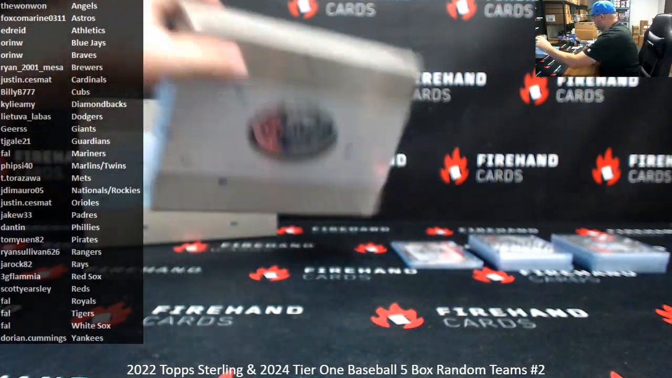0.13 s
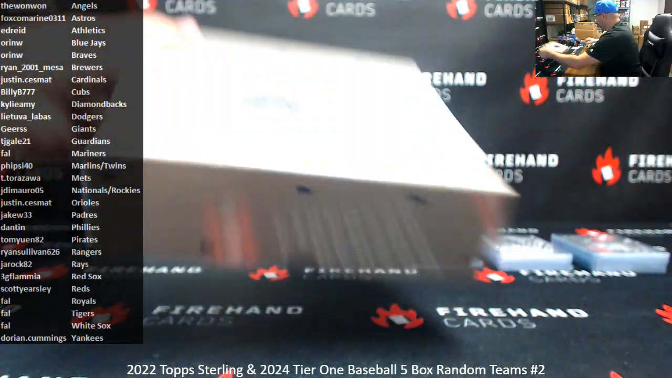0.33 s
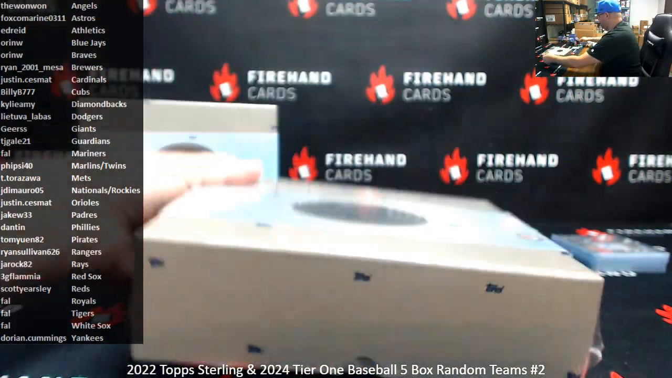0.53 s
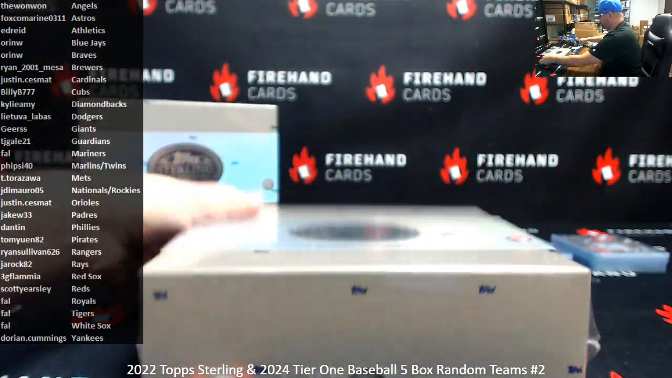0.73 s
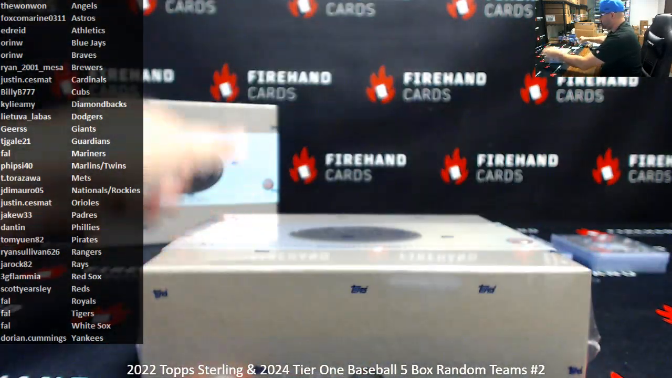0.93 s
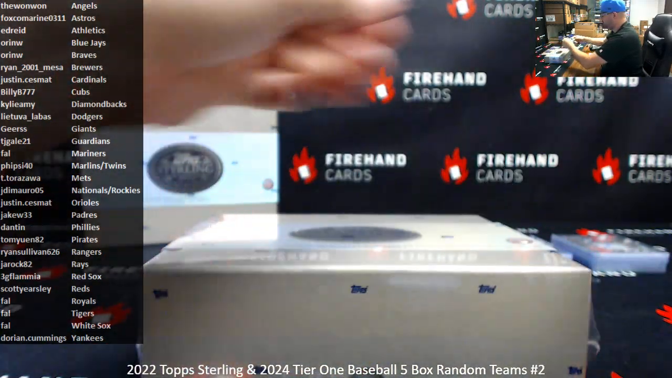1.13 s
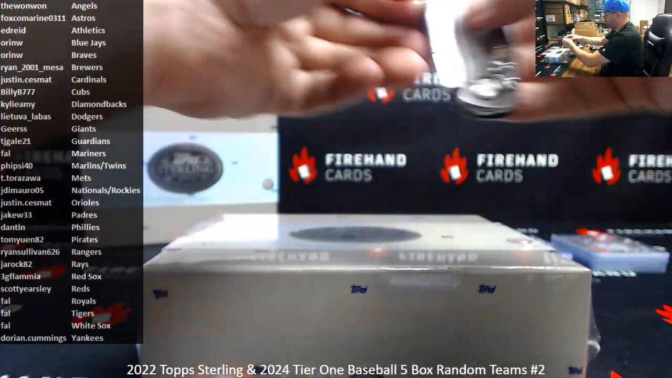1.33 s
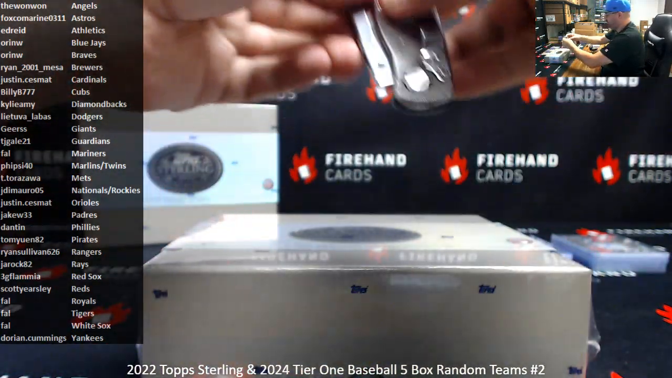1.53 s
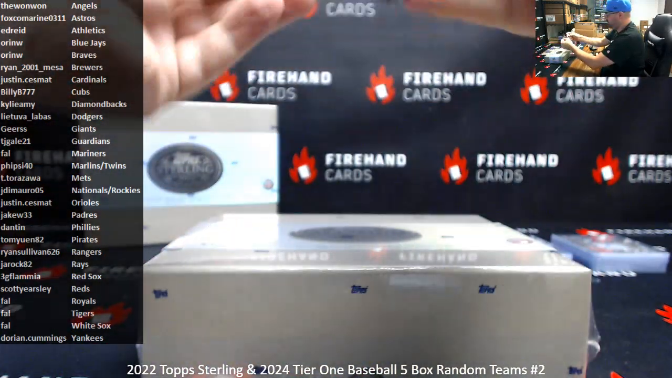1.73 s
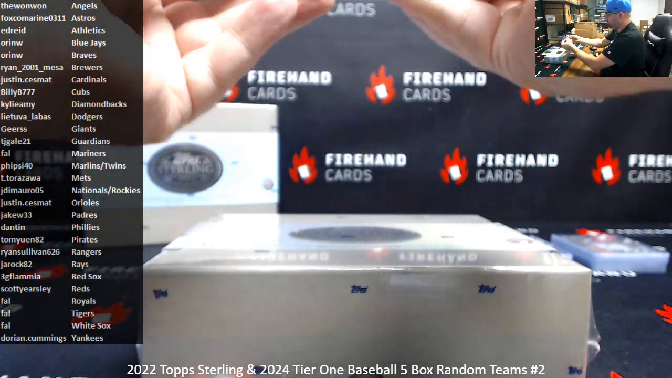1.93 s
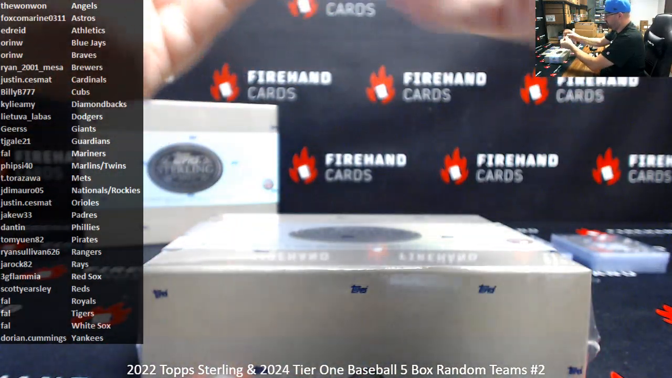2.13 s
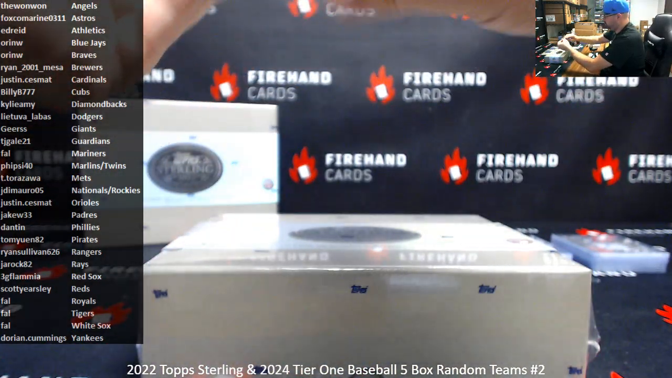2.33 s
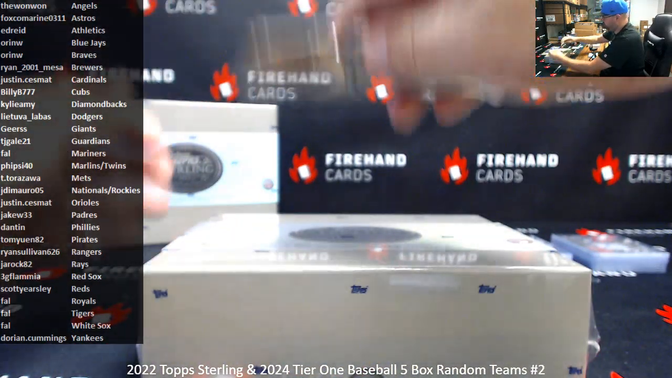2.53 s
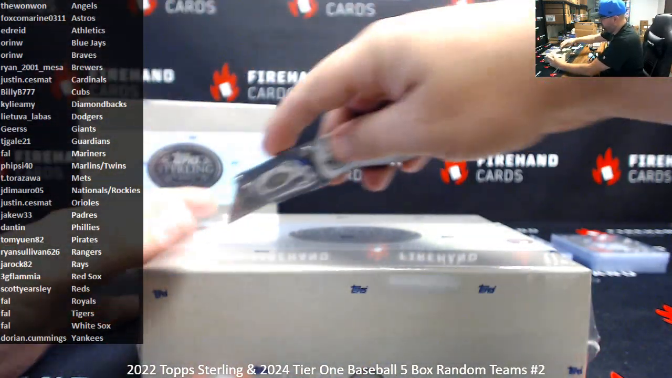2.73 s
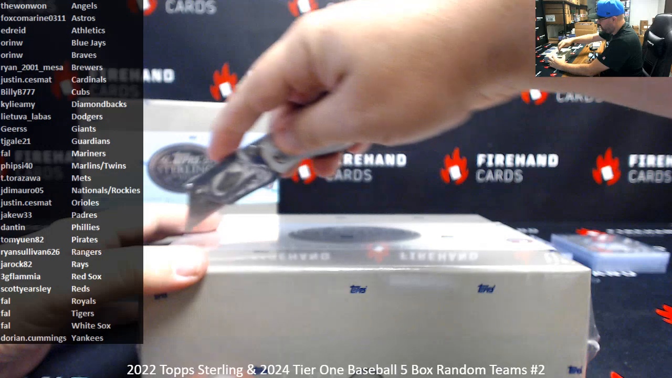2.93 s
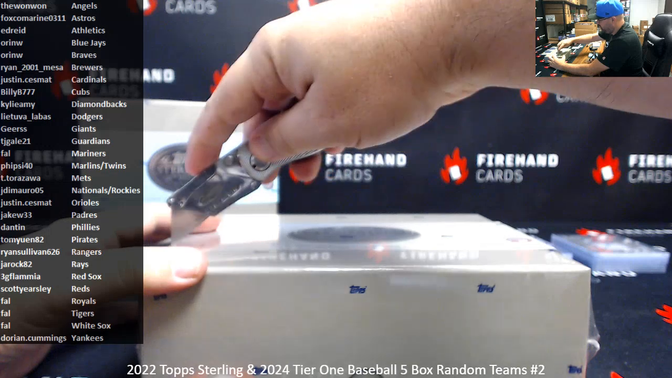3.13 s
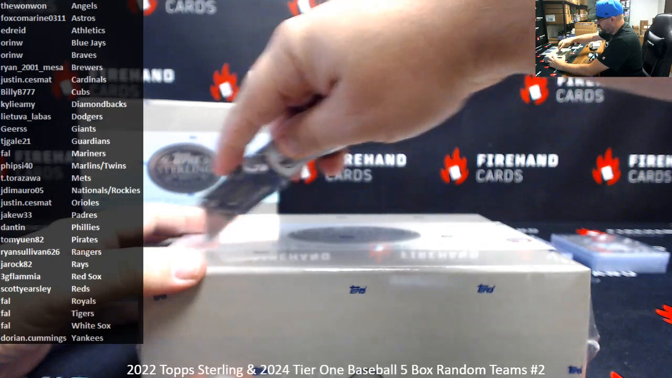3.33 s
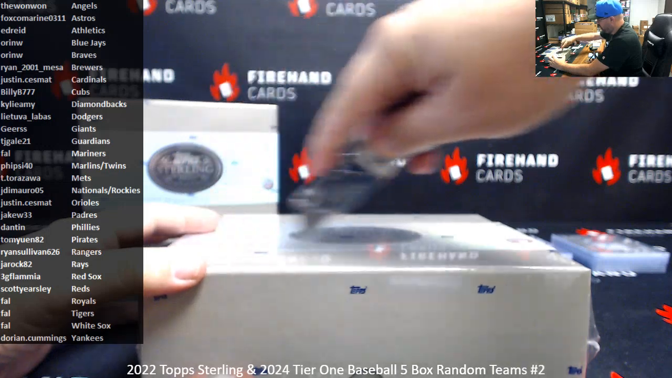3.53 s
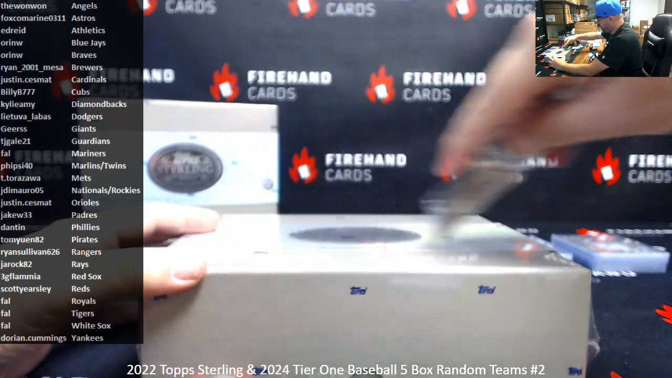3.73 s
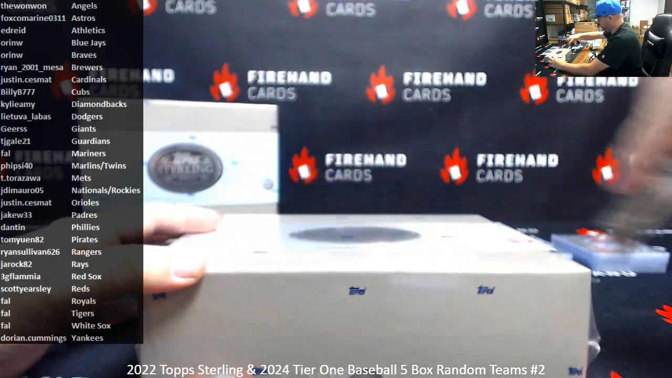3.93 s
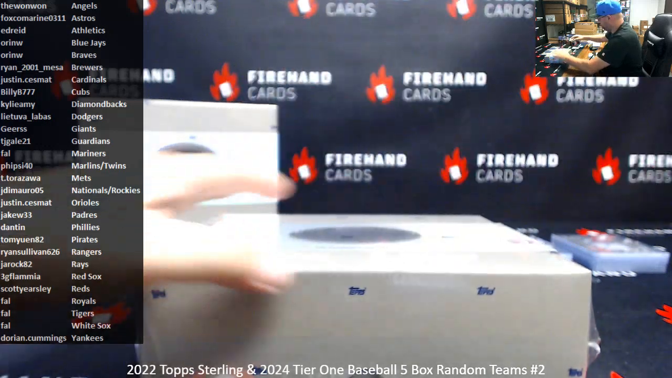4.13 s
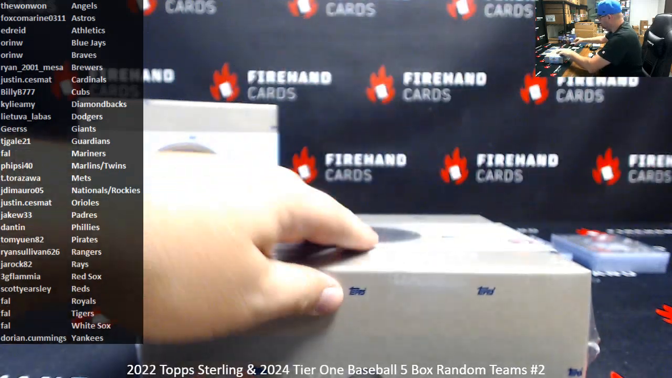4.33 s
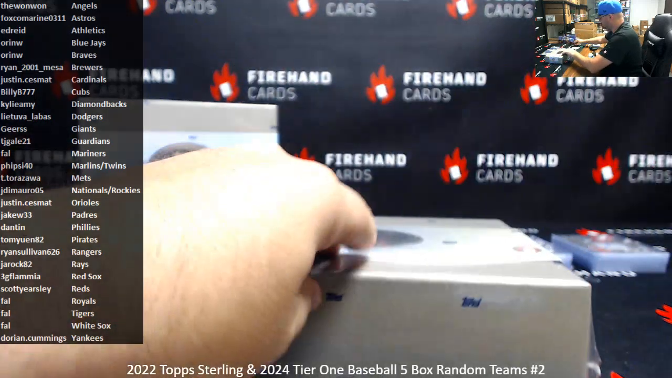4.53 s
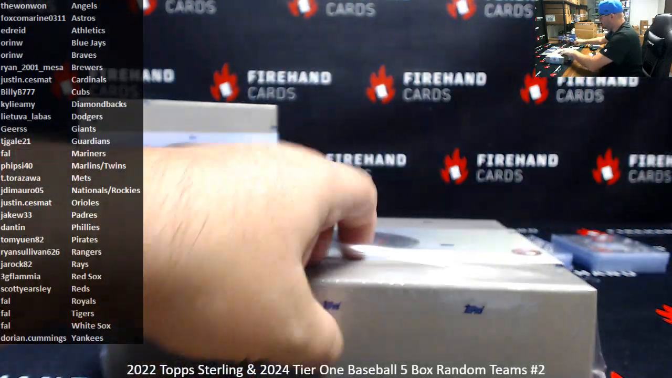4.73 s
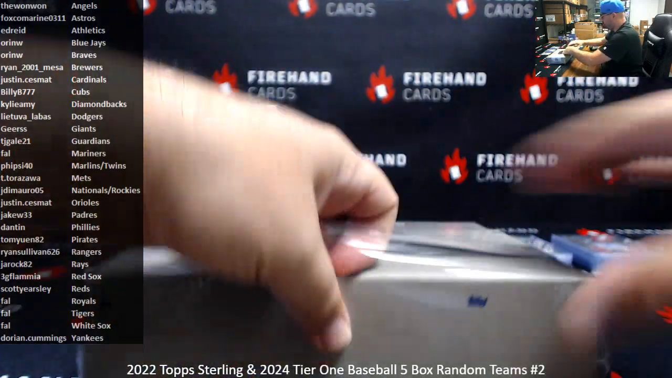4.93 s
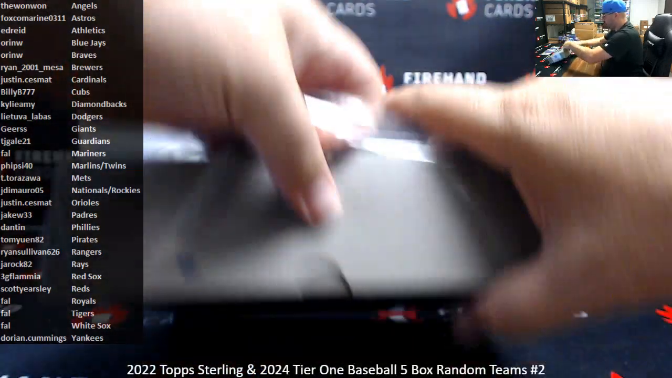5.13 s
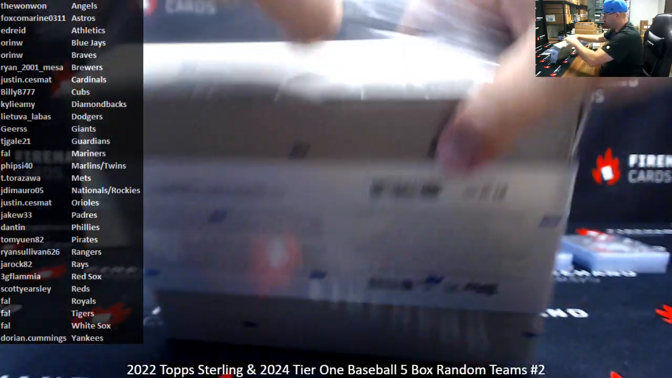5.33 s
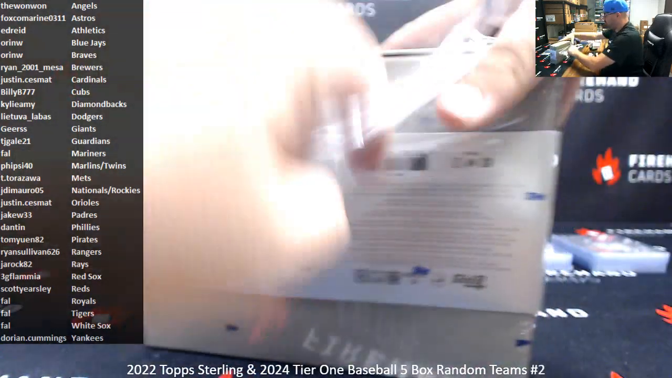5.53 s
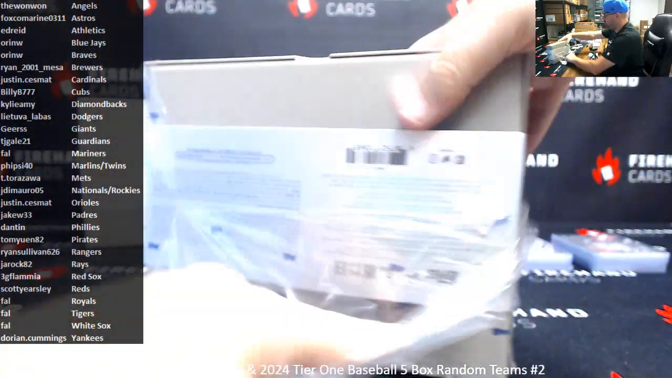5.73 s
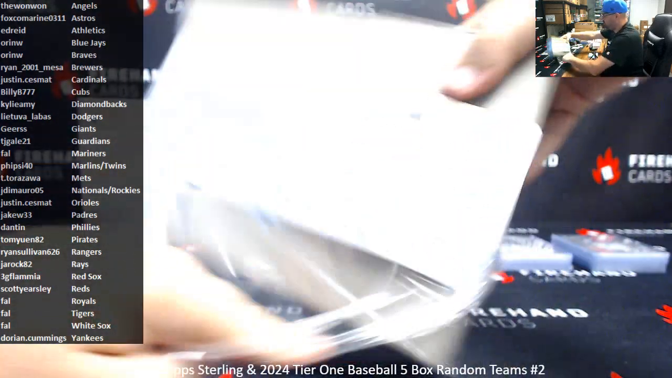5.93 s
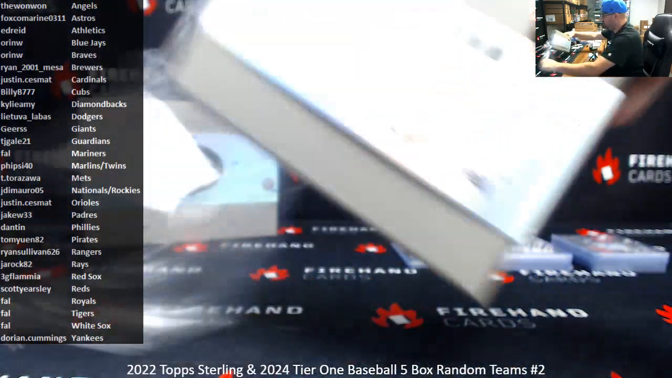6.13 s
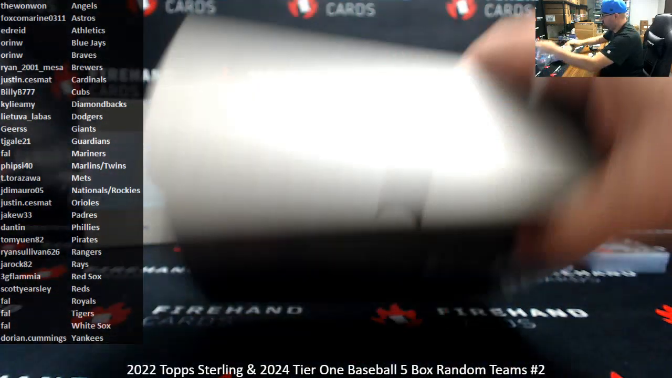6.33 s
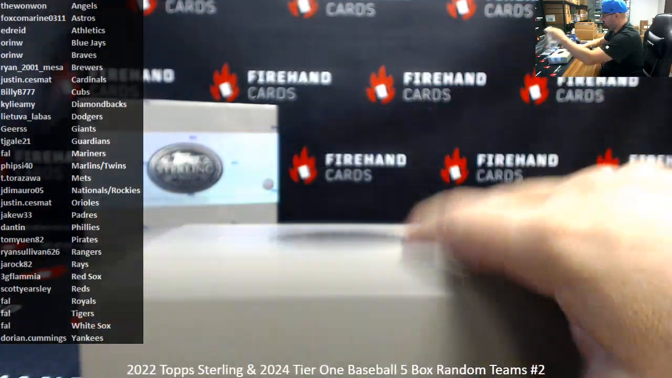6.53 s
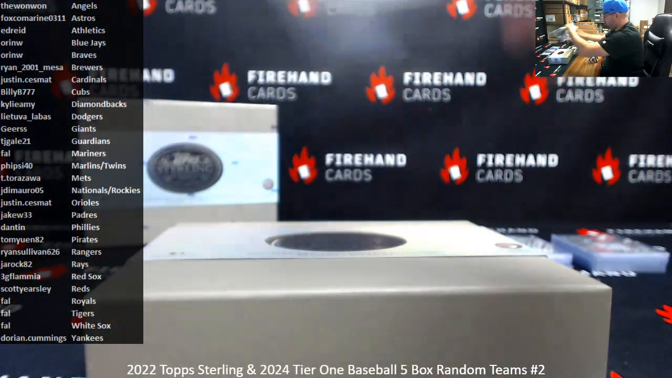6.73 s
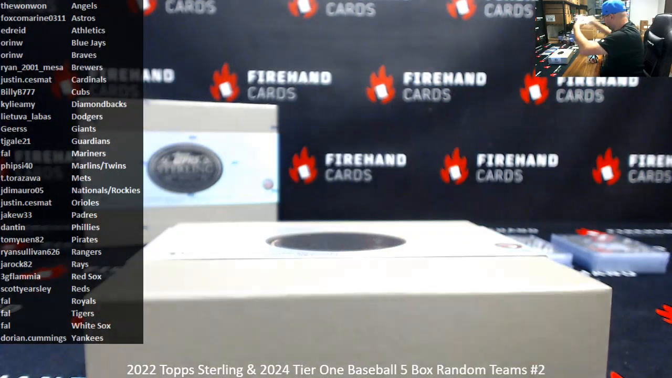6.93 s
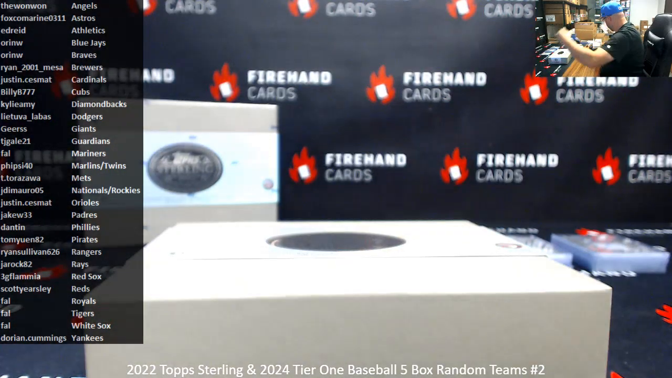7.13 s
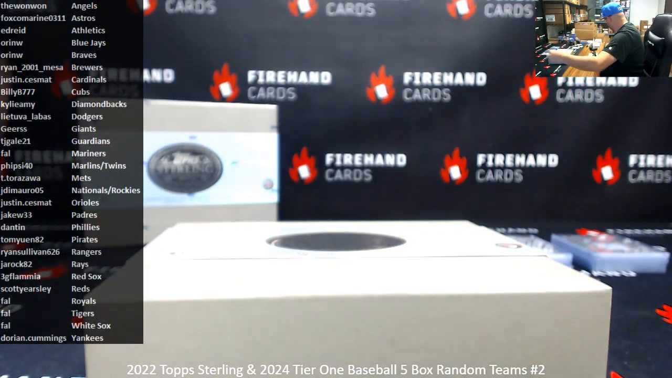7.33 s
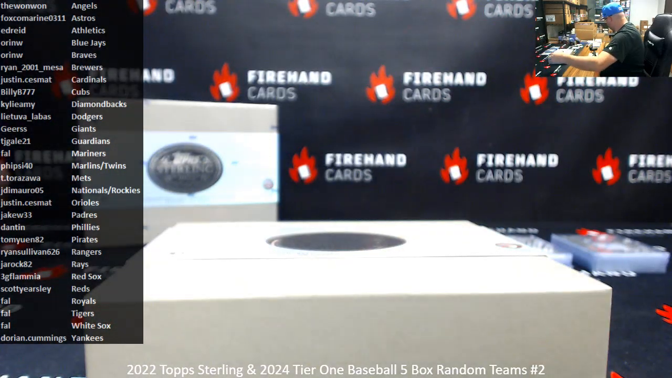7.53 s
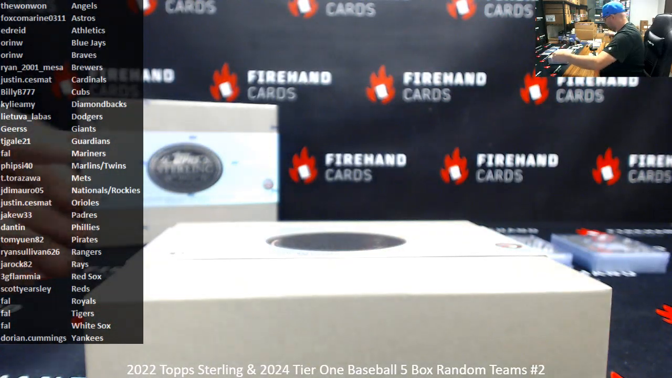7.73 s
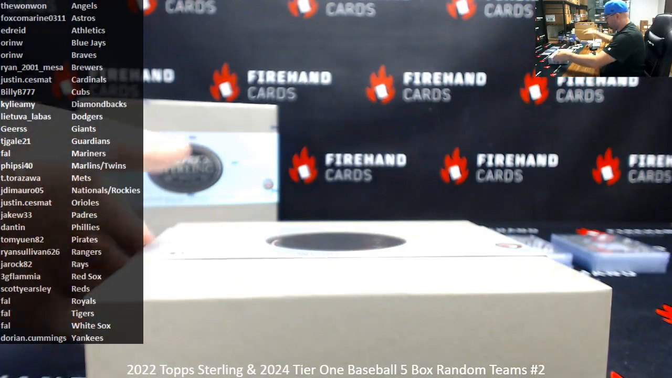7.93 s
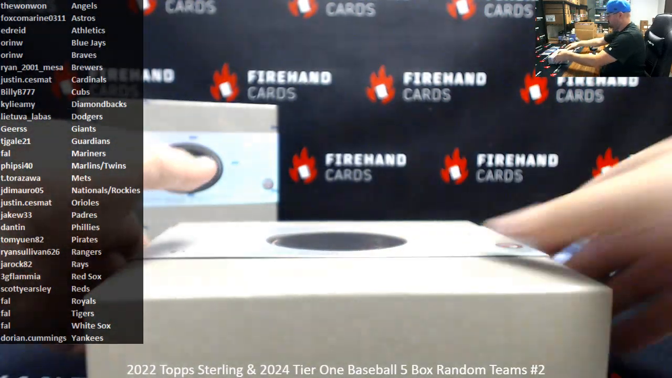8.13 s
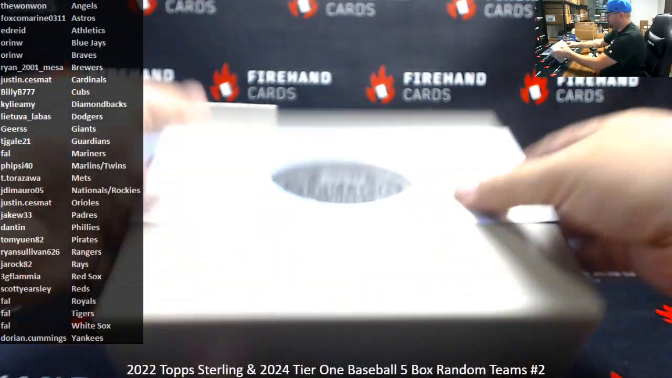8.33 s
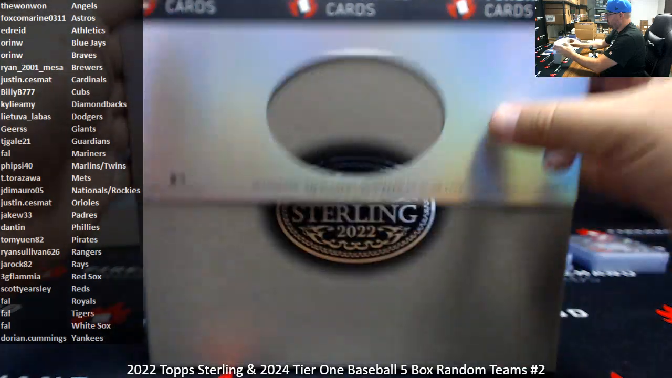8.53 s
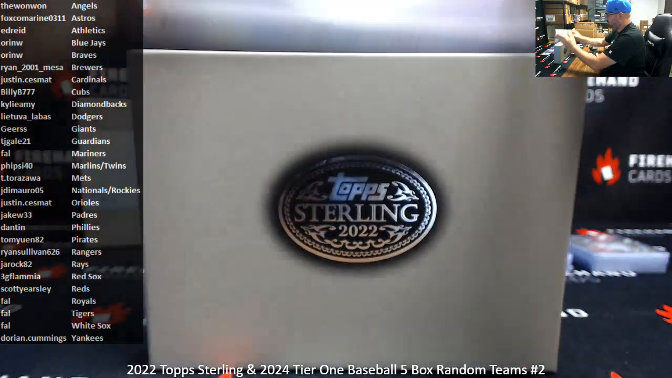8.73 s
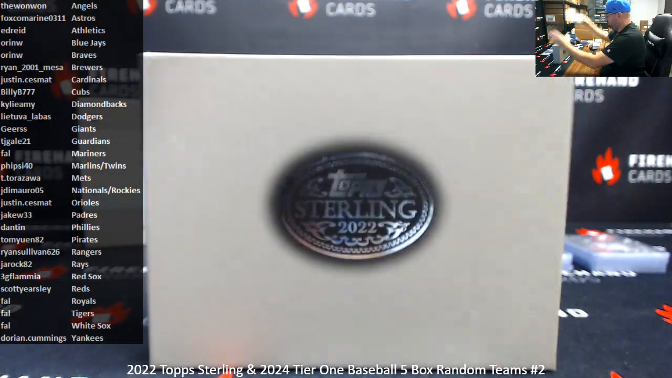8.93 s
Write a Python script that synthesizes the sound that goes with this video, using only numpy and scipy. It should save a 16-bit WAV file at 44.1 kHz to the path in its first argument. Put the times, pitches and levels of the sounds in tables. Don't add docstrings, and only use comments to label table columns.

```python
import sys
import numpy as np
from scipy import signal
from scipy.fft import rfft, irfft, next_fast_len
from scipy.io import wavfile
from scipy.ndimage import uniform_filter1d

SR = 44100
rng = np.random.default_rng(int(sys.argv[2]) if len(sys.argv) > 2 else 0)


def volts_from_db(level):
    exponent = np.asarray(level, float) / 20
    return 10 ** exponent


def put_to_file(sound):
    columns = np.atleast_2d(sound).T
    safe = np.clip(columns, -1, 1)
    whole_steps = np.round(safe * 32767)
    wavfile.write(sys.argv[1], SR, whole_steps.astype(np.int16))


N = 400869
T = np.arange(N) / SR

# [t/s, hum level/dB, deep modes/dB, hardness/dB, hum f/Hz]
LANDINGS = [(.367, -31.5, 6.5, -2, 215.6), (.411, -41, -8, -6, 240), (0.589, -42, -2, -5, 226),
            (.596, -19.5, -11, -15.5, 236), (.6341, -30, -5, -13, 236), (6.241, -32.5, 4, -8.5, 231),
            (6.296, -24, 5, 0, 222), (6.336, -29.5, -7, -15, 235), (6.418, -8, -8, -10, 227),
            (6.4312, -16.5, -10, -19, 227), (6.4442, -19.5, -6, -14, 226.6), (6.466, -30.5, 9, -14, 226),
            (8.093, -41, 1, -10, 227), (8.101, -24.5, -10, -16, 235.6), (8.331, -27.5, -9, -8.5, 228),
            (8.347, -15, -2.5, -13, 232.4), (8.37, -14, -7.5, -10.5, 236), (8.406, -23.5, -3, -11, 235.9)]
# [t/s, hum level/dB, deep modes/dB, hardness/dB]
KNOCKS = [(0.107, -35, -15, -14), (1.095, -50.5, -20, -7), (2.975, -59, 16.5, -2), (3.748, -48, 10, -1.5),
          (4.161, -57, 13, -1), (4.513, -42.5, 3, -11), (4.539, -43.5, -2, -27), (4.64, -33, 1.5, -8),
          (4.7, -44.5, 2, -10), (5.05, -29.5, 3, -6.5), (5.089, -38.5, -6, -15), (5.198, -37, 4.5, -13),
          (5.287, -34.5, -12, -14), (5.443, -33, -6, -5.5), (5.877, -33.5, -7, -7),
          (6.127, -47.5, -5, -4.5), (8.028, -61, 18, 4), (8.559, -48.5, 4, 3), (8.842, -41, -2, -13),
          (9.032, -49, 2, -7), (9.066, -42.5, 2.5, -8)]
# [multiple of hum f, level/dB, t60/s]
HUM = [(1, 4, 0.093), (1.003, -14, 0.36), (.87, -14.5, 0.12), (1.1, -8, 0.093)]
# [f/Hz, level/dB, t60/s]
DEEP = [(68, -16, 0.45), (123.6, -10.5, 0.13), (142.4, 0.5, 0.12)]
# [f/Hz, level/dB, t60/s]
BOX = [(322.8, -5, 0.17), (402, 2.5, 0.062), (491, -6.5, 0.08)]
# [f/Hz, level/dB, t60/s]
BOARD = [(611, 2.5, 0.091), (702, 8.5, 0.054), (787, -4, 0.091), (1100, -12, 0.027), (1470, -18, 0.052),
         (2040, -11, 0.031), (2970, -7.5, 0.016), (3480, -17, 0.042)]

# [t/s, peak level/dB, start f/Hz, end f/Hz, length/s]
SQUEAKS = [(1.416, -35.5, 5350, 5950, 0.017), (1.42, -38, 6050, 6450, .028),
           (1.53, -18.5, 8900, 8760, 0.022), (1.532, -25, 7700, 7680, 0.03),
           (1.533, -35, 10510, 10300, 0.014), (1.532, -30.5, 9600, 9400, .02),
           (1.55, -47, 10400, 10200, .07), (1.545, -54, 13000, 13000, .085),
           (1.533, -42, 14600, 14100, .06), (1.546, -21.5, 8150, 7900, 0.042), (1.54, -48, 6800, 6500, .03),
           (1.559, -55, 2100, 1900, 0.012), (1.574, -40, 2680, 2620, .055), (1.577, -42, 5370, 5250, .049),
           (.14, -51, 1615, 1480, 0.021), (0.13, -58, 2100, 1800, 0.024), (0.11, -55, 750, 730, .02)]
# [f/Hz, level/dB, t60/s]
BLADE_RING = [(7740, -54.5, .45), (7800, -52.5, .45), (8080, -53, .45), (8810, -57, .4)]
# [t/s, level/dB]
HINGE = [
    (1.47, -80),
    (1.5, -68.5),
    (1.55, -65),
    (1.62, -67.5),
    (1.663, -68),
    (1.672, -58),
    (1.7, -65),
    (1.75, -80),
]
# [t/s, peak level/dB]
LOCK = [
    (1.77, -3),
    (1.772, -12),
    (1.775, -7),
]
# [f/Hz, level per Hz/dB]
LOCK_CRACK = [(410, -66.5), (830, -48), (1050, -27.5), (1890, -26), (3000, -8.5), (4260, -3), (5400, -7),
              (13700, -12.5), (16000, -20)]
# [f/Hz, width/Hz, level/dB]
STEEL = [(3458, 710, -9), (4350, 400, -3.5), (4796, 400, -9.5), (5550, 250, -4.5), (8300, 1500, -13)]

# [t/s, pressure level/dB, panel resonance f/Hz, speed as hiss level/dB]
CUT = [
    (3.08, -86, 678, -12),
    (3.126, -61, 688, -7.5),
    (3.254, -44.5, 830, -17.5),
    (3.432, -45, 827, -6.5),
    (3.576, -40.5, 775, -8),
    (3.708, -43, 860, -3),
    (3.752, -62, 765, 7.5),
    (3.8, -68, 712, -12),
]
# [multiple of panel resonance f, width/Hz, level/dB]
LID = [(.52, 90, -2.5), (.78, 80, -6), (1, 111, 1), (1.5, 159, -8), (1.9, 200, -16.5), (2.4, 220, -12.5),
       (3, 400, -17)]
# [f/Hz, level per Hz/dB]
BLADE_HISS = [(710, -38), (1200, -1.5), (1890, -2), (2430, -4), (3470, -10.5), (6000, -16.5),
              (13900, -31.5), (16000, -34)]

# [peak t/s, effort level/dB, rise/s, fall/s, box body/dB]
HOLDING = [(.1, -71.5, 0.25, 0.21, 11.5), (0.298, -57.5, 0.2, 0.15, -11), (0.389, -59.5, 0.018, 0.062, 7.5),
           (0.2, -64, 0.19, .12, -6), (0.495, -73.5, 0.12, 0.11, 0), (0.614, -70.5, .03, 0.072, 2),
           (7.33, -67, .03, .1, 3), (7.45, -69, .05, .12, 2), (7.31, -66, 0.061, 0.74, -0.5),
           (2.188, -74, .04, 0.038, -9), (2.45, -77, 0.0059, .03, -8), (2.64, -72.5, .25, .03, -15),
           (4.666, -58, 0.041, 0.14, 0)]
# [peak t/s, effort level/dB, rise/s, fall/s, box body/dB]
TEARING = [(5.018, -49.5, 0.016, .1, -1.5), (5.09, -58.5, 0.11, 0.15, 4), (5.144, -46, 0.014, 0.055, 0.5),
           (5.29, -58, 0.088, .07, 3.5), (5.41, -48, .13, 0.069, 2), (5.455, -42.5, .008, 0.1, -4),
           (5.54, -56.5, 0.089, 0.14, -3), (5.64, -62, 0.071, 0.059, -5), (4.92, -70, 0.087, .06, -7),
           (6.26, -59.5, 0.051, 0.058, -5), (5.688, -58, .02, 0.072, 0), (5.845, -53, .18, 0.082, -6.5),
           (5.885, -41.5, .012, 0.18, -2), (5.98, -50, 0.14, .08, -16), (6.085, -53, .012, 0.14, -11),
           (6.17, -52, 0.14, 0.18, -8), (6.31, -57.5, .008, 0.17, 5.5), (6.43, -59.5, 0.036, 0.076, 12.5),
           (6.55, -82, .1, 0.081, -11), (6.63, -53.5, 0.037, 0.2, -12), (6.742, -46, 0.19, 0.1, -10.5),
           (6.95, -63.5, .2, 0.17, -15), (7.198, -51, 0.14, 0.065, -3)]
# [peak t/s, effort level/dB, rise/s, fall/s, box body/dB]
SLIDING = [(.56, -64, 0.085, 0.096, -3), (4.215, -67, 0.047, 0.41, -2), (4.62, -66, 0.28, 0.11, 3),
           (4.971, -62, .006, 0.08, -5), (5.23, -55.5, 0.084, 0.067, 1.5), (5.78, -66.5, 0.038, 0.045, 2),
           (7.654, -79, .03, 0.019, -6), (7.696, -81, 0.013, 0.066, -9), (7.79, -62, 0.037, 0.13, -11),
           (7.9, -70.5, 0.091, 0.027, -12), (7.984, -70, 0.017, 0.035, -3), (8.03, -64, 0.022, 0.2, 0),
           (8.301, -51, 0.099, 0.1, -7), (8.36, -55.5, 0.036, 0.11, 5), (8.5, -53, 0.23, 0.11, -13),
           (8.564, -56, 0.036, 0.074, 8), (8.63, -54.5, 0.016, 0.063, 6.5),
           (8.677, -57, 0.0068, 0.059, 12.5), (8.85, -68, 0.017, 0.085, 3), (8.88, -65.5, .03, 0.098, -5),
           (8.95, -62.5, 0.067, .08, -2), (9.0, -68, .05, 0.077, -4), (9.09, -67, 0.014, .02, 6)]
# [rustle from f/Hz, rustle to f/Hz, body from f/Hz, body to f/Hz]
VOICES = [(1710, 5700, 450, 1600), (1630, 7500, 450, 1520), (3670, 10200, 535, 2220)]
CRISP_DB = (-10, -3, -4.5)
CRISP_PER_BODY = (-0.028, -0.096, -0.13)
# [f/Hz, level per Hz/dB]
FILM = [(240, 11), (400, 6), (598, -5), (676, -1), (1140, -11.5), (1680, -8), (1840, -6), (3580, -12),
        (7280, -9), (13900, -20.5), (16000, -18.5)]
# [t/s, peak level/dB, low part/dB, high part/dB]
SNAPS = [(.138, -39, -8, -39), (.3651, -31, -15.5, -16), (1.6689, -43, -25, -20), (4.4209, -44, -11, -13),
         (4.4442, -39.5, -15, -7), (4.4942, -42.5, -8, -8), (4.6436, -30.5, 3, -9),
         (4.6678, -34.5, -20, -16), (4.7446, -39, -10.5, -15), (4.9676, -43, -30, -15),
         (5.0095, -33.5, -23, -18), (5.1447, -25.5, -15, -38), (5.44, -14.5, -21, -17.5),
         (5.4869, -19.5, -11, -4.5), (5.5394, -36, -17, 0), (5.68, -37, -15, -14),
         (5.8596, -12.5, -20.5, -15.5), (6.2934, -25, -6, -24), (6.4148, -25, -8.5, -17),
         (6.4911, -43, -17, 1), (6.6054, -34, -17, -9), (8.2487, -33, 6, -12), (8.2844, -41, 4, -12),
         (8.5606, -36, -8, -11), (8.6244, -35, -12, -24), (8.6757, -31, -4, -34), (8.9416, -39, -29, -32.5)]
# [t/s, peak level/dB, low part/dB]
TICKS = [(.4783, -50, -23), (1.0997, -51.5, -8), (2.1702, -62, -22), (2.4494, -63, -6), (2.6194, -52, -26),
         (2.9694, -55, -16), (3.1168, -53, 0), (3.15, -60, 0), (3.18, -56, 0), (5.389, -34, -13),
         (6.08, -46, -20), (3.9, -52.5, -26), (6.9494, -46.5, -30), (7.1294, -60, -7), (7.4195, -44.5, -9),
         (8.09, -42.5, -21)]

# [t/s, level/dB, time to settle by 20 dB/s]
SHOVES = [(0, -57.5, 4), (.43, -39.5, .5), (.68, -39, 0.16), (1.2, -62.5, 1.2), (2.56, -46.5, 0.73),
          (4.84, -53, 0.5), (5.12, -43, 1.1), (5.52, -39, 0.24), (5.9, -40.5, 0.15), (6.17, -42, 1.1),
          (6.48, -30, 0.12), (6.66, -55, 0.5), (8.08, -48.5, 0.5), (8.4, -39.5, 0.35), (9.09, -57.5, .3)]
# [f/Hz, t60/s]
ROOM = [(125, 0.17), (500, 0.22), (2000, 0.16), (5000, 0.18), (14000, 0.2)]
# [f/Hz, level per Hz/dB]
AIR = [(12, -37.5), (20, -13), (91, -5), (130, -9.5), (222, -6.5), (270, -17.5), (377, -10), (485, -20.5),
       (527, -15), (825, -24.5), (897, -23), (1030, -24), (2820, -37.5), (4420, -42.5), (16000, -48)]


def knocks():
    out, t = np.zeros(N), T[:SR // 3]
    light_bump_hz = 229.3
    blows = LANDINGS + [(*knock, light_bump_hz) for knock in KNOCKS]
    loads = rng.standard_normal((len(blows), 4, len(BOARD), 1))
    rattles = rng.standard_normal((len(blows), len(t)))
    swell = (1 - np.exp(-t / 0.0037)) ** 2
    choke = 0.55 + 0.44 * np.exp(-(t / 0.11) ** 2)
    hum_start = swell * choke * (1 - np.exp(-t / 0.0076))
    slap_start = 1 - np.exp(-t / .0009)
    for (s, db, deep_db, hard_db, hum_hz), load, rattle in zip(blows, loads, rattles):
        thud = evened(band(rattle, 300, 990, order=2)) * volts_from_db(-60 * t / 0.1) * (1 - np.exp(-t / 0.0026))
        add(out, s - .004, volts_from_db(db + hard_db - 11.5) * thud)
        slap_db = -1 + 1.28 * hard_db
        hum = np.multiply(HUM, [hum_hz, 1, 1])
        parts = [(hum, 0, hum_start, .004), (DEEP, deep_db, swell, .03),
                 (BOX, hard_db, np.sqrt(swell), .03), (BOARD, slap_db, slap_start, .05)]
        for (modes, share_db, start, spread), luck in zip(parts, load):
            sound = ring(modes, t, 1 + spread * luck[:len(modes)]).sum(0) * start
            add(out, s - .004, volts_from_db(db + share_db) * sound / abs(sound).max())
    return out


def squeak(db, hz0, hz1, length):
    t = T[:int(length * SR)]
    unsteady_hz = (0.013 * hz0 + .17 * abs(hz1 - hz0)) * np.sqrt(.014 / length)
    octave = volts_from_db(-20) * (4 * hz0 < SR * .8)
    slips = rng.standard_normal((2, 4096))
    drift, grip = uniform_filter1d(uniform_filter1d(slips, 60), 60)
    hz = hz0 + (hz1 - hz0) * np.sqrt(t / length) + unsteady_hz * np.tanh(evened(drift)[:len(t)])
    turns = 2 * np.pi * np.cumsum(hz) / SR
    bite = np.sin(np.pi * (t / length) ** 0.46) ** 1.4 * volts_from_db(2.5 * evened(grip)[:len(t)])
    fuzz = []
    for k, noise in zip((1, 2), slips):
        edges_hz = np.minimum(k * hz.mean() * np.array([1 - 0.068, 1 + 0.068]), [20000, 21000])
        fuzz.append(evened(band(noise, *edges_hz, order=4))[-len(t):])
    smear = volts_from_db(-11) * fuzz[0] + volts_from_db(-20) * (octave > 0) * fuzz[1]
    smear = smear * (min(.03 / length, 1) * min(hz0 / 5500, 1)) ** 2
    tone = np.sin(turns) + octave * np.sin(2 * turns)
    return volts_from_db(db) * (tone + smear) * bite * (1 - np.exp(-t / .0012)) ** 2


def knife():
    out = np.zeros(N)
    for s, *shape in SQUEAKS:
        add(out, s, squeak(*shape))
    add(out, 1.56, ring(BLADE_RING, T[:SR // 4]).sum(0) * signal.windows.tukey(SR // 4, .3))
    t = np.arange(HINGE[0][0], HINGE[-1][0], 1 / SR)
    slips = grit(3010, 2.7, .8, length=len(t))
    grind = patchy(resonate(slips, 3860, 600) + .6 * resonate(slips, 6100, 700), 3.95)
    add(out, t[0], volts_from_db(np.interp(t, *np.transpose(HINGE))) * evened(band(grind, 2160, 7000)))
    t = T[:SR // 3]
    for s, db in LOCK:
        jolt = rng.standard_normal(len(t))
        crack = colour(jolt, LOCK_CRACK) * (volts_from_db(-60 * t / 0.08) + 0.18 * volts_from_db(-60 * t / 0.27))
        steel = sum(volts_from_db(g_db) * evened(resonate(resonate(jolt, hz, w), hz, w)) for hz, w, g_db in STEEL)
        strike = crack + 0.1 * steel * volts_from_db(-60 * t / 0.33)
        add(out, s - .001, volts_from_db(db - 16.5) * strike * (1 - np.exp(-t / 0.0008)))
    return out


def cutting():
    s, *columns = np.transpose(CUT)
    t = np.arange(s[0], s[-1], 1 / SR)
    press_db, hz, hiss_db = (np.interp(t, s, c) for c in columns)
    boom_db = -1 - 2.8 * abs(hiss_db + 8)
    slips = grit(4000, 2.4, 1.53, length=len(t)) * volts_from_db(1.1 * slow(30, length=len(t)))
    rasp = colour(slips, [(200, -27), (330, 7.0), (900, 7.0), (1600, -14), (2400, -48)])
    panel = volts_from_db(6.0) * patchy(rasp, 2.1, size=1024, count=4)
    for k, width, db in LID:
        wander = k * hz * (1 + .05 * slow(9, length=len(t)))
        bright_db = (hiss_db + 11.0) * (k > 1.7)
        level_db = db + bright_db + 3 * slow(14, length=len(t))
        panel += volts_from_db(level_db) * evened(resonate(resonate(slips, wander, width), wander, 2 * width))
    hiss = patchy(colour(slips, [(600, -36.5)] + BLADE_HISS), 1.8)
    boom = resonate(resonate(slips, 194, 120), 216, 220)
    out = np.zeros(N)
    add(out, s[0], volts_from_db(press_db) * (evened(panel) + volts_from_db(hiss_db) * hiss + volts_from_db(boom_db) * evened(boom)))
    return out


def rubbing():
    film = patchy(colour(grit(3000, 2.5, 1.5), FILM), 1.4) * volts_from_db(1.3 * slow(90))
    film = patchy(film, 2.0, size=1024, count=4) * volts_from_db(0.96 * slow(25))
    out, crisp = np.zeros(N), broad(film, 10860, 18100)
    kinds = zip([HOLDING, TEARING, SLIDING], VOICES, CRISP_DB, CRISP_PER_BODY)
    for strokes, voices, top_db, per_body in kinds:
        power = np.zeros((3, N))
        for s, effort_db, rise, fall, body_db in strokes:
            at = slice(max(int((s - 2 * rise) * SR), 0), int((s + 2 * fall) * SR))
            away = np.maximum((s - T[at]) / rise, (T[at] - s) / fall)
            shares_db = np.c_[0, body_db, top_db + per_body * body_db].T
            power[:, at] += volts_from_db(2 * (effort_db - 18.5 * away ** 1.01 + shares_db))
        rustle, body = broad(film, *voices[:2]), broad(film, *voices[2:])
        out += (np.sqrt(power) * [rustle, body, crisp]).sum(0)
    return out


def snaps():
    out, t = np.zeros(N), T[:SR // 5]
    tick_high_db = -13
    cracks = SNAPS + [(*tick, tick_high_db) for tick in TICKS]
    hiss = rng.standard_normal((len(cracks), len(t)))
    for (s, db, low_db, high_db), noise in zip(cracks, hiss):
        tilt = [(300, low_db - 13.0), (1700, low_db), (4500, -24.5),
                (9000, high_db - 12.5), (16000, high_db - 26.5)]
        crack = colour(noise, tilt) * (volts_from_db(-60 * t / 0.027) + 0.83 * volts_from_db(-60 * t / 0.099))
        add(out, s - .001, volts_from_db(db - 14.0) * crack * (1 - np.exp(-t / 0.0015)))
    return out


def sway():
    sway_hz, lean_s, rest_db = 33.6, 0.089, -74
    shoves_db = [db - 20 * np.maximum((s - T) / lean_s, (T - s) / settle) for s, db, settle in SHOVES]
    level = volts_from_db(rest_db) + volts_from_db(np.max(shoves_db, 0))
    wobble = np.sin(2 * np.pi * np.cumsum(sway_hz + 0.51 * slow(2.7)) / SR) * volts_from_db(2.1 * slow(6.98))
    push = rng.standard_normal(N)
    rumble = volts_from_db(-8.0) * evened(band(push, 58, 191))
    rumble += volts_from_db(-12.5) * evened(resonate(resonate(push, 228, 40), 228, 80))
    return level * (volts_from_db(0.5) * wobble + volts_from_db(-2.0) * rumble)


def room(x):
    taps = np.zeros(SR // 2)
    at = np.arange(150, len(taps) - 20, 20)
    taps[at + rng.integers(0, 20, len(at))] = rng.choice([-1., 1.], len(at))
    hz, t, z = signal.stft(taps, SR, nperseg=256)
    tail = signal.istft(z * volts_from_db(-60 * t / read(ROOM, hz)[:, None]), SR, nperseg=256)[1]
    return signal.fftconvolve(x, tail / np.linalg.norm(tail))[:N]


def air():
    hiss = rng.standard_normal(N)
    whine = volts_from_db(-89.5) * evened(resonate(hiss, 2600, 74)) + volts_from_db(-94) * evened(resonate(hiss, 7400, 300))
    return volts_from_db(-59 + 0.85 * slow(4.1)) * colour(hiss, AIR) + whine


def evened(x):
    return x / np.sqrt(np.mean(x ** 2) + 1e-20)


def read(points, hz):
    f, value = np.transpose(points)
    return np.interp(np.log(hz + 1), np.log(f + 1), value)


def add(mix, s, sound):
    part = mix[round(s * SR):][:len(sound)]
    part += sound[:len(part)]


def colour(x, points):
    size = next_fast_len(len(x))
    gain = volts_from_db(read(points, np.fft.rfftfreq(size, 1 / SR)))
    return evened(irfft(rfft(x, size) * gain, size)[:len(x)])


def band(x, lo_hz, hi_hz, order=3):
    edges_hz = [lo_hz, min(hi_hz, SR / 2 - 1)]
    return signal.sosfilt(signal.butter(order, edges_hz, "band", fs=SR, output="sos"), x)


def broad(x, lo_hz, hi_hz):
    return evened(signal.sosfiltfilt(signal.butter(1, [lo_hz, hi_hz], "band", fs=SR, output="sos"), x))


def resonate(x, hz, width):
    turn = np.exp(2j * np.pi * np.cumsum(hz * np.ones(len(x))) / SR)
    r = np.exp(-np.pi * width / SR)
    return 2 * (turn * signal.lfilter([1 - r], [1, -r], x / turn)).real


def ring(modes, t, detune=1):
    hz, db, t60 = np.transpose(modes)[:, :, None]
    return volts_from_db(db - 60 * t / t60) * np.sin(2 * np.pi * hz * detune * t)


def grit(per_s, spread_db, smooth, length=N):
    size = volts_from_db(spread_db * np.minimum(rng.exponential(1, length), 5)) * (rng.random(length) < per_s / SR)
    return evened(size * rng.standard_normal(length)) + smooth * rng.standard_normal(length)


def slow(per_s, length=N):
    width = max(int(SR / per_s), 1)
    return evened(uniform_filter1d(uniform_filter1d(rng.standard_normal(length), width), width))


def patchy(x, depth_db, size=256, count=14):
    z = signal.stft(x, nperseg=size)[2]
    patches = uniform_filter1d(uniform_filter1d(rng.standard_normal(z.shape[::-1]), count, 0), 3, 1)
    return signal.istft(z * volts_from_db(depth_db * evened(patches).T), nperseg=size)[1][:len(x)]


def scene():
    thuds, blade, hands = knocks(), knife(), rubbing() + snaps() + cutting()
    echo = room(volts_from_db(-11.5) * thuds + volts_from_db(-10.0) * blade + volts_from_db(-10.0) * hands)
    return (thuds + blade + hands + echo + sway() + air())[None]


def roll_off(x):
    return signal.sosfilt(signal.butter(12, 16530, fs=SR, output="sos"), x)


def record(dry):
    limited = signal.oaconvolve(dry, signal.firwin(255, 15900, fs=SR)[None], "same")
    return roll_off(limited)


dry = scene()
out = record(dry)
put_to_file(out)
```